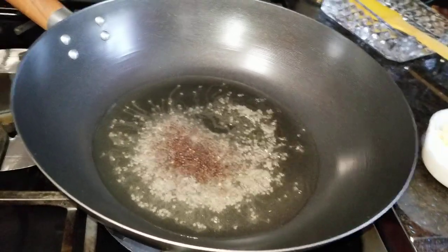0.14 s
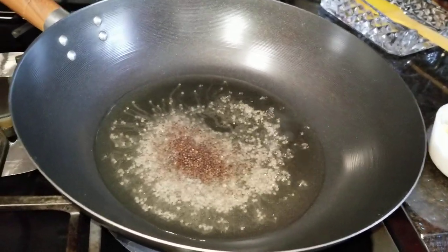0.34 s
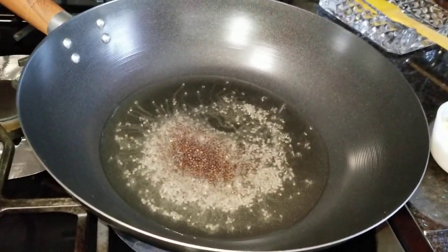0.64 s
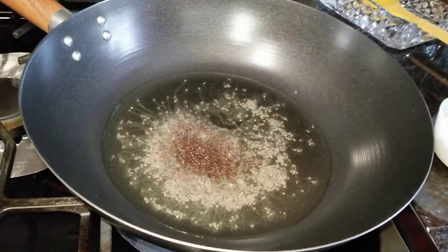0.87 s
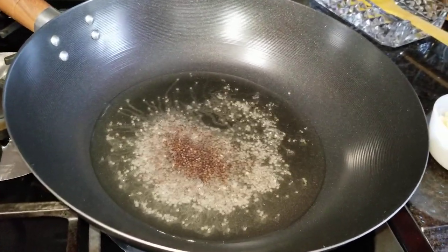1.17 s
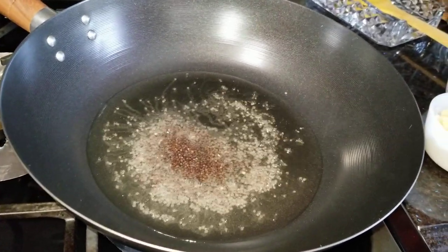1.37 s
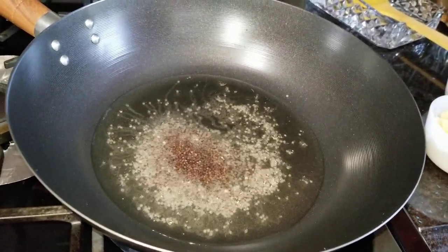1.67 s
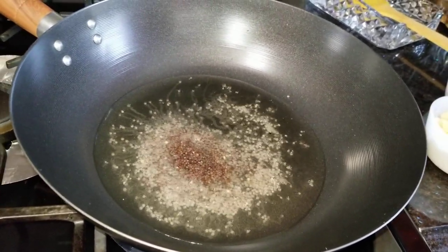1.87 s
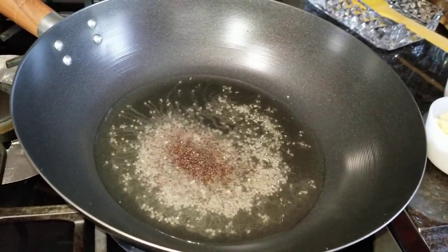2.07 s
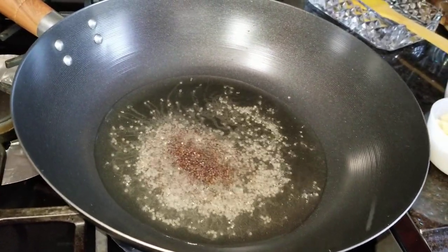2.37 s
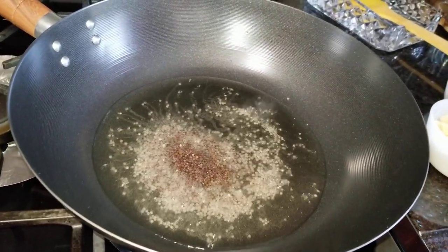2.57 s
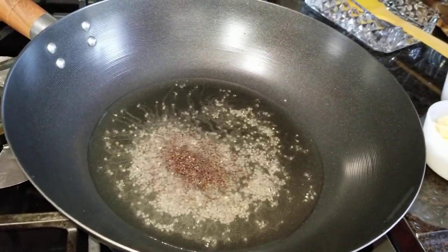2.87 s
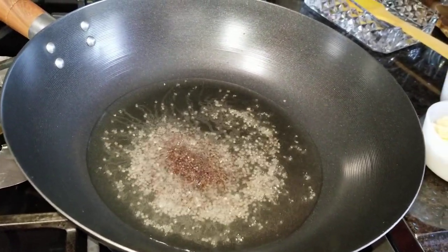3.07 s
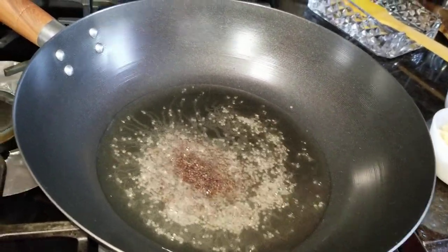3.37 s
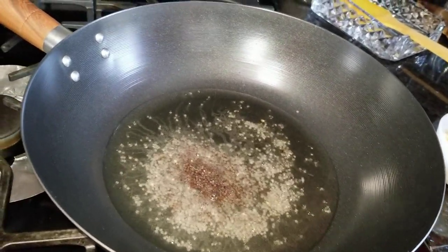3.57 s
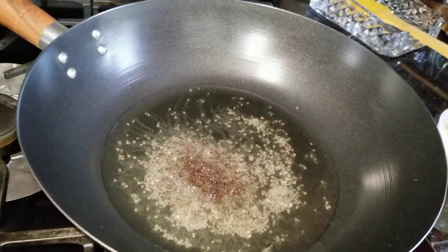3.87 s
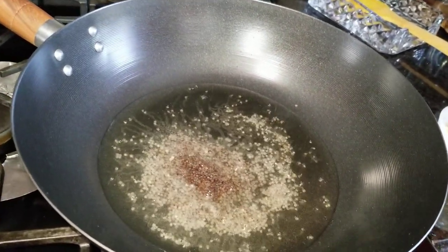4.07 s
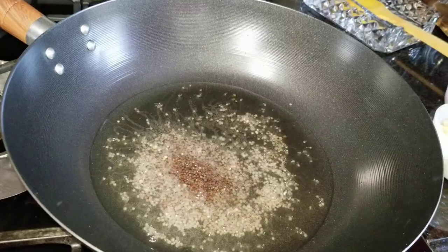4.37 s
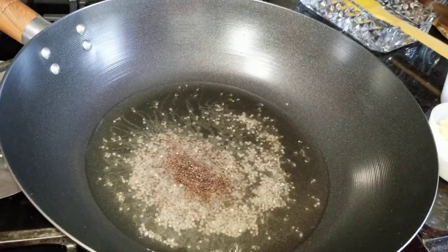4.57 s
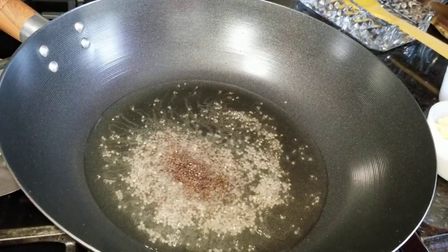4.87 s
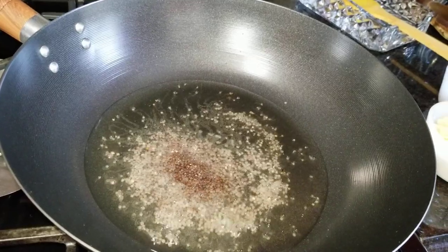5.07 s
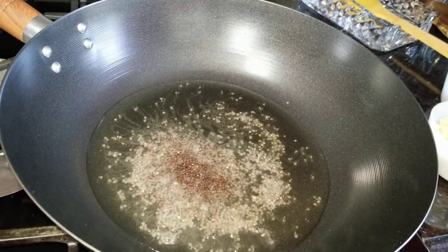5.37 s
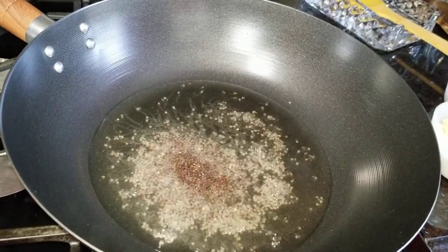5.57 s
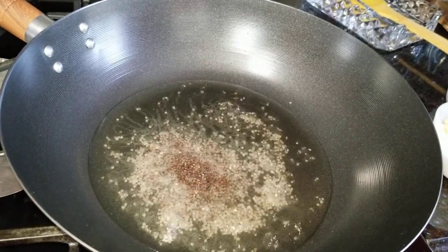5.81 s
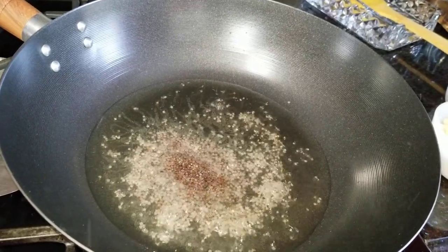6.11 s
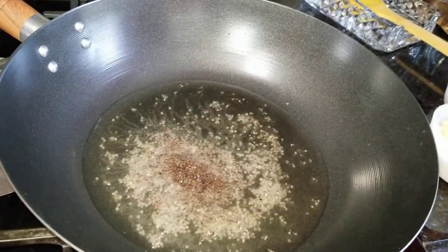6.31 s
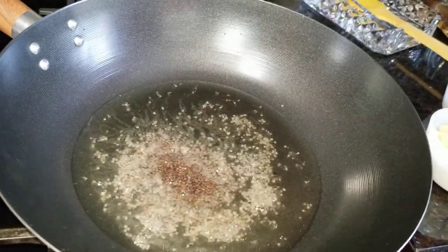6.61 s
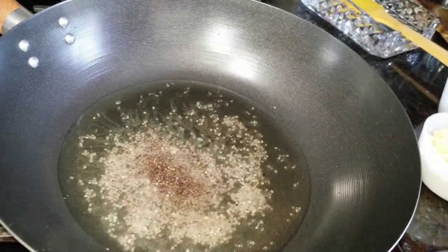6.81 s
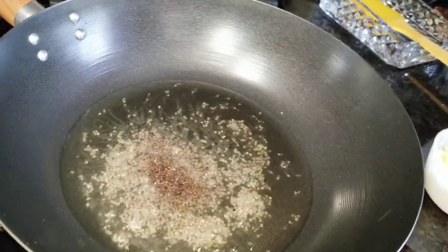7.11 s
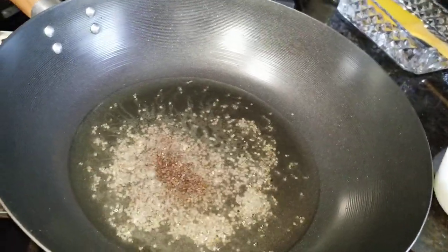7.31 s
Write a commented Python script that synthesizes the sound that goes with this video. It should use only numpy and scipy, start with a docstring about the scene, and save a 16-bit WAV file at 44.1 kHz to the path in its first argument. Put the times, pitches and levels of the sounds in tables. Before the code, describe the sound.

Mustard seeds burst in hot oil in a wok, very close to a stereo microphone in a small hard-walled kitchen. Sharp irregular pops, snaps and ticks ride on fine bright fizz, with tiny chirping bubbles and brief steam spits. They start busy, thin out after the first second, then crowd together from about three seconds. Two deep thumps jolt the microphone, near 0.7 and 5.7 seconds.

```python
"""Mustard seeds bursting in hot oil

Seeds burst in a wok, close to a stereo camera in a small hard-walled kitchen. Each burst is an impulse
coloured by a plop, a snap and a tick; some bubbles ring with a rising note, some husks sputter steam.
Sparse decaying echoes make the room. Blasts displace a microphone, and its low cut rings.
Under it lie the fizz of the oil, a crackling filtered noise, and a kitchen hum of rumble and motor tones;
the level of both drops abruptly at times and drifts gradually in between."""
import sys
import numpy as np
from scipy import signal
from scipy.fft import rfft, irfft
from scipy.io import wavfile
from scipy.ndimage import uniform_filter1d, minimum_filter1d

SR = 44100
rng = np.random.default_rng(int(sys.argv[2]) if len(sys.argv) > 2 else 0)


def store_wav(level_fs):
    """Save 16-bit WAV to argv[1]."""
    pcm = np.round(np.clip(np.atleast_2d(level_fs), -1, 1) * 32767)
    wavfile.write(sys.argv[1], SR, pcm.T.astype(np.int16))


def makeup_ratio(level_db):
    """Linear amplitude ratio for a level in decibels (20 dB per factor of ten)."""
    decades = np.asarray(level_db, float) / 20
    return 10 ** decades


N = 328545
BURST, LEAD = 300, 40  # samples in a burst, and of run-up before its peak

# Background level, with abrupt drops and gradual drifts. Each row: time in seconds, reference level in dB.
BACKGROUND = [(0, -52.5), (.7, -51.5), (0.759, -63.5), (1.6, -63), (2.098, -60.5), (2.9, -59), (3.4, -52.5),
              (4.2, -55), (4.6, -54.5), (5.6, -53.5), (5.721, -57.5), (6.8, -60), (7.45, -58.5)]


def evened(x):
    """Normalization: scales a signal to an rms of 1."""
    return x / np.sqrt(np.mean(x ** 2) + 1e-20)


def read(points, hz, column=1):
    """Spectral envelope: interpolates a table along log frequency."""
    table = np.transpose(points)
    return np.interp(np.log(hz + 1), np.log(table[0] + 1), table[column])


def noise(spectrum, same, patchy_db):
    """Partly coherent noise: two channels of random short-time spectra share a part; patches drift."""
    hz = np.fft.rfftfreq(1024, 1 / SR)
    a, b, c, d, patches = rng.standard_normal((N // 256 + 5, 513, 5)).T
    patches = uniform_filter1d(patches, size=10, axis=0)  # along frequency
    patches = evened(uniform_filter1d(patches, size=8, axis=1))  # along time
    same = np.clip(same, 0, 1)
    left = a + 1j * b
    right = same * left + np.sqrt(1 - same ** 2) * (c + 1j * d)
    z = np.array([left, right])
    z *= makeup_ratio(read(spectrum, hz)[:, None] + patchy_db * patches)
    return evened(signal.istft(z, nperseg=1024, noverlap=768)[1][:, :N])


def background_db(seconds):
    """Level envelope: interpolates the reference level of the background at the given times."""
    return np.interp(seconds, *np.transpose(BACKGROUND))


def fizz():
    """Superposition: countless tiny bubbles in the oil merge to a bright, finely crackling hiss."""
    # Spectrum of the hiss. Each row: frequency in Hz, relative level in dB per Hz.
    fizz_spectrum = [(400, -40), (900, -24), (2000, -24), (4000, -13), (8000, -7), (9500, -8), (11500, -1),
                     (15600, -1), (16200, -25)]
    crackle = uniform_filter1d(rng.exponential(1, (2, N)) ** 2 - 2, size=40)
    crackle = makeup_ratio(3.2 * evened(crackle))
    level_db = background_db(np.arange(N) / SR) + [[8.5], [6.5]]  # left, right
    return crackle * noise(fizz_spectrum, same=0.049, patchy_db=2.9) * makeup_ratio(level_db)


def hum():
    """Tones in noise: a few slightly wavering motor tones, equal in both channels, over a low rumble."""
    # Rumble under the tones. Each row: frequency in Hz, relative level in dB per Hz.
    rumble_spectrum = [(30, -8.5), (55, 5.5), (90, -25), (130, -8.5), (430, -15.5), (560, -19.5),
                       (1000, -28.5), (1500, -47)]
    # Motor tones. Each row: frequency in Hz, relative level in dB.
    motor_tones = [(59.2, -63), (123.8, -72.5), (236.9, -73.5), (355.3, -71.5), (414.5, -76)]
    t = np.arange(N) / SR
    waver = evened(uniform_filter1d(rng.standard_normal((len(motor_tones), N)), size=9000))
    tones = np.zeros(N)
    for (hz, db), waver_db in zip(motor_tones, 1.2 * waver):
        tones += makeup_ratio(db + waver_db) * np.sin(2 * np.pi * (hz * t + rng.random()))
    rumble = noise(rumble_spectrum, same=0.77, patchy_db=0.5)
    return (0.84 * rumble + 0.79 * evened(tones)) * makeup_ratio(background_db(t))


def pop(s, chance, plop_db, snap_db, tick_db):
    """Impulse and scattering: one sharp crack, scattered by the curved wok wall, takes a colour."""
    # The treble leans left as the camera drifts. Each row: time in seconds, left over right in dB.
    treble_lean = [(0, 5.5), (2.8, 3.5), (3.7, 10), (7.45, 8)]
    t = np.arange(BURST) / SR
    crack = .18 * (chance[0] + chance[1:]) * np.exp(-t / .0004)
    crack[:, 0] = -1  # the husk splits
    crack[1] = np.roll(crack[1], round(abs(chance[0, -1])))  # reaches the right microphone a little later
    plop_hz = 3100 * (1 + .09 * chance[1, -1])  # steam bubbles differ in size
    colour = [(300, plop_db - 22.5), (1000, plop_db - 15.0), (2000, plop_db - 10.5), (plop_hz, plop_db),
              (6500, snap_db), (9300, (snap_db + tick_db) / 2 - 3), (12000, tick_db), (16000, tick_db - 5)]
    hz = np.fft.rfftfreq(BURST, 1 / SR)
    lean_db = np.interp(s, *np.transpose(treble_lean)) * np.array([[.5], [-.5]]) * np.minimum(hz / 9000, 1)
    # each husk has its own peaks and dips
    uneven_db = 2 * evened(uniform_filter1d(chance[2, -len(hz):], size=9))
    spectrum = rfft(crack) / np.linalg.norm(crack, axis=1)[:, None]
    spectrum *= makeup_ratio(read(colour, hz) + lean_db + uneven_db)
    return np.roll(irfft(spectrum, BURST), LEAD, 1)


def bursts(events):
    """Linear superposition: adds up pops, each given by its peak's moment and its plop, snap, tick in dB."""
    out = np.zeros((2, N + SR))
    for s, *levels in events:
        chance = rng.standard_normal((3, BURST))
        out[:, round(s * SR) - LEAD:][:, :BURST] += pop(s, chance, *levels)
    return out[:, :N]


def large_seeds():
    """Impulsive sources: large seeds burst, and drops of oil flung by each land as weaker ticks."""
    # Seeds bursting. Each row: moment of the crack's peak in seconds, then plop, snap and tick levels in dB.
    large_bursts = [(0.0605, 2, -8, -2), (0.135, 1, -38, -17), (0.192, -3.5, -1, -10),
                    (0.1948, 1, 1.5, -0.5), (0.2578, 5, 0, -3), (0.3794, -13, -14, -17),
                    (0.4456, -9, -7, -26), (0.4701, -5.5, -4.5, -6), (0.5326, 4.5, 1.5, 14.5),
                    (0.5522, -2.5, -11, 1), (0.629, -4, -4, -2), (0.6822, -3, 0, 4), (0.891, -2, -14.5, -5),
                    (0.9209, 0, -10.5, -8), (1.1495, -6, -13, -2), (1.2245, -13, -8, -3),
                    (1.2574, 2.5, 0, -8), (1.4265, -10.5, -9, -12), (1.6265, -7, -4.5, 4.5),
                    (1.845, -11.5, -10.5, -14), (1.9701, -3, -3.5, 3), (1.9926, -20, -11, -11),
                    (2.2237, 5, 3, -2.5), (2.2588, -3.5, -6, 1), (2.2957, -22, 1.5, -19),
                    (2.537, 1.5, 1.5, 0.5), (2.7048, 2, -6, 1), (2.825, -6, -7, -1.5),
                    (2.8806, -3.5, -10, 0), (2.9011, 2, -11, -4), (2.9099, 4.5, -2, 2), (3.1443, 8, 3.5, 3),
                    (3.3147, 2.5, -6, -1.5), (3.4697, -19, -4, -12), (3.5171, -1.5, 2, 3),
                    (3.649, 8.5, 5.5, 2), (3.6601, -5, -3, -8), (3.723, -19, -12, -2), (3.782, -17, -23, 2),
                    (3.8016, 6, 7, 14), (3.879, 0.5, -20, 1.5), (3.9226, 1, -6, 1), (3.9427, 11, 5, 1.5),
                    (4.0032, -0.5, -11, 1.5), (4.049, -3, -6, -1), (4.1027, 3, -10, -22),
                    (4.1943, -3.5, -5.5, -1), (4.2352, -6.5, -6, 2.5), (4.2846, -39, -10, -7),
                    (4.5313, -8, -7.5, -12), (4.612, -2, -9, -9), (4.6297, 3, 0.5, -4),
                    (4.6492, 8, 0, -2.5), (4.6987, 6, -4, -31), (4.765, -0.5, 3.5, -6), (4.84, -4, -9, -18),
                    (4.9406, -10.5, -8, 0.5), (4.974, -27, -5, -6), (5.0506, 0, -14, 2),
                    (5.086, 4, -34, -3), (5.11, -1, 8, 3.5), (5.2301, -6.5, -27, 2), (5.258, 0.5, -7, 6),
                    (5.2768, -10, -21, -8), (5.3715, -17.5, -5, -6), (5.4698, -6.5, -11, -0.5),
                    (5.482, -2, -4, -6), (5.501, 5.5, -4, -7), (5.5236, -2, -6, -2), (5.5487, -40, -6, 1),
                    (5.6152, 3.5, -10.5, -2.5), (5.6871, -4.5, -2, -4), (5.798, 1, 4, -6),
                    (5.8168, 7.5, -19, -29), (5.8347, -18, 2.5, 13.5), (5.9329, -1.5, -5, 7),
                    (5.959, -3, -7, -14), (5.9768, 1.5, -4, 0), (6.0686, 6.5, -1.5, -3),
                    (6.079, -29, -1.5, 0), (6.1564, 5, -4, -5), (6.1847, -4, -9.5, -5),
                    (6.202, -10, -6, -18), (6.239, -8, -3, -9), (6.353, -1.5, -7, -7),
                    (6.5036, -19.5, -23, -5.5), (6.5931, 3.5, -10, 6), (6.6349, 0, -4, -3.5),
                    (6.78, 1, -3.5, -14), (6.7971, -18, -3.5, -10), (6.8767, -26, -12, -9),
                    (6.9238, -5.5, -19, -4), (7.083, -34, -1, -16), (7.0947, 1.5, -17, -10),
                    (7.1615, -10, -10, -0.5), (7.372, -5.5, -6, 3)]
    events = list(large_bursts)
    for s, *levels in large_bursts:
        for delay, *weaker in rng.random((2, 4)):  # two drops
            landing = s + .35 * delay ** 2  # most land soon, a few late
            events.append((landing, *(levels - (20 + 12 * np.array(weaker)))))
    return bursts(events)


def small_seeds():
    """Random point process: lesser seeds burst at random moments, at levels tied to the background."""
    per_s, over_db, spread_db = 55, 27, 5  # rate; level over the background; scatter of plop, snap, tick
    count = round(per_s * N / SR)
    moments = LEAD / SR + rng.random(count) * N / SR
    levels = background_db(moments)[:, None] + over_db + spread_db * rng.standard_normal((count, 3))
    return bursts(np.column_stack([moments, levels]))


def kitchen(x):
    """Reverberation: sparse echoes set in after a millisecond; three tails take turns, so echoes vary."""
    # Reverberation by band. Each row: frequency in Hz, relative echo level in dB, t60 in seconds.
    reverberation = [(1050, 9, 0.31), (3260, 9, 0.14), (6460, 8.5, 0.22), (12700, 8, 0.2)]
    out, count = np.zeros((2, N)), SR // 2
    turn = np.arange(N) / SR * 23  # radians
    for k in range(3):
        taps = np.zeros((2, count))
        at = np.arange(50, count - 8, 8) + rng.integers(0, 8, (2, (count - 51) // 8))
        np.put_along_axis(taps, at, rng.standard_normal(at.shape), 1)
        hz, t, z = signal.stft(taps, SR, nperseg=128)
        t60 = read(reverberation, hz, column=2)[:, None]
        decay = makeup_ratio(-60 * t / t60)
        decay += makeup_ratio(-24 - 60 * t / (3 * t60))  # the slower tail of the next room
        decay *= makeup_ratio(read(reverberation, hz)[:, None]) / np.linalg.norm(decay, axis=1)[:, None]
        tail = signal.istft(z * decay, SR, nperseg=128)[1] * np.sqrt(8 / 64)
        share = np.sqrt(2 / 3) * np.cos(turn + k * np.pi / 3)
        out += signal.oaconvolve((x.mean(0) * share)[None], tail, axes=1)[:, :N]
    return out


def sputters():
    """Jet noise: steam leaves some husks in short uneven hisses that rise quickly and die away."""
    # Hisses. Each row: start in seconds, level in dB before the rise and decay shape it.
    steam_hisses = [(0.064, -30.5), (0.63, -24), (0.682, -27.5), (3.651, -31), (3.802, -35), (3.923, -29),
                    (4.005, -25), (4.055, -25.5), (4.234, -31), (4.818, -34.5), (4.98, -31.5), (5.058, -24),
                    (5.258, -27)]
    # Spectrum of the steam. Each row: frequency in Hz, relative level in dB per Hz.
    steam_spectrum = [(900, -26), (2500, -17.5), (6500, -13), (9300, -14), (12500, -12.5), (16000, -14)]
    rise_s, t60_s = 0.0025, 0.17
    level, t = np.zeros(N + SR), np.arange(SR // 4) / SR
    for s, db in steam_hisses:
        level[round(s * SR):][:len(t)] += (1 - np.exp(-t / rise_s)) * makeup_ratio(db - 60 * t / t60_s)
    uneven = makeup_ratio(1.2 * evened(uniform_filter1d(rng.standard_normal(N), size=80)))
    return noise(steam_spectrum, same=0.19, patchy_db=-1.5) * level[:N] * uneven


def bubbles():
    """Damped resonance: a crack sets off a bubble's brief rising note, which excites a mode of the wok."""
    # Ringing bubbles. Each row: start of the note, which is the peak of its crack, in seconds,
    # initial pitch in Hz, note level in dB before flutter.
    ringing_bubbles = [(.4104, 3880, -39.5), (0.8193, 3010, -29.5), (0.8563, 3540, -26), (1.342, 2510, -27),
                       (1.4331, 4180, -36), (1.789, 3110, -31.5), (2.009, 3430, -32.5), (2.378, 2760, -39),
                       (2.433, 3160, -32), (2.5527, 2680, -28.5), (2.827, 2460, -30.5), (2.9784, 3670, -32),
                       (3.0269, 3300, -32), (3.307, 4040, -37), (3.486, 3440, -26), (3.601, 2930, -23),
                       (4.0976, 3060, -25), (4.316, 2645, -28.5), (4.478, 3530, -38), (4.8204, 2920, -31),
                       (5.3278, 2680, -28), (5.597, 2720, -34), (6.1489, 2510, -26), (6.569, 2630, -26),
                       (7.0545, 3100, -32), (7.316, 2210, -31.5), (7.3587, 2650, -34),
                       (7.3686, 3000, -25.5)]
    # The mode that the notes set ringing. Each row: frequency in Hz, level in dB, t60 in seconds.
    wok_modes = [(2643, -54.5, 0.26)]
    t60_s, rise_per_s = 0.016, 6.3  # decay; share of its pitch that the note gains in a second
    t, notes = np.arange(4000) / SR, np.zeros(N + SR)
    for s, hz, db in ringing_bubbles:
        flutter = 1 + 1.02 * evened(uniform_filter1d(rng.standard_normal(len(t)), size=60))
        note = np.sin(2 * np.pi * hz * t * (1 + rise_per_s * t / 2)) * flutter
        notes[round(s * SR):][:len(t)] += makeup_ratio(db - 60 * t / t60_s) * note
    t = np.arange(SR // 2) / SR
    wok = sum(makeup_ratio(db - 60 * t / t60) * np.sin(2 * np.pi * hz * t) for hz, db, t60 in wok_modes)
    # plop, snap and tick of the crack, in dB over the note's table level
    cracks = bursts([(s, db + 20, db + 18.5, db + 16.5) for s, hz, db in ringing_bubbles])
    return cracks + notes[:N] + signal.oaconvolve(notes, wok)[:N]


def jolts():
    """Step response: a blast makes the diaphragm jump aside, creep for some milliseconds and stay."""
    # Blasts. Each row: start in seconds, microphone (0 left, 1 right), then sudden jump and slower push,
    # both as displacements before the low cut (full scale = 1).
    blasts = [(.7092, 0, 2.4, 2.0), (.7092, 1, .5, 1.0), (5.6675, 0, 2.0, 3.2), (.9216, 0, -.072, -.054),
              (1.2241, 0, .065, .25), (1.9703, 0, .031, .066), (2.8798, 0, -.05, -.2),
              (3.8018, 0, -.03, -.62), (4.0042, 0, .06, .45), (4.1945, 0, -.056, -.035),
              (4.9737, 0, .06, 1.3), (5.8348, 0, -.03, -.12), (6.0793, 0, -.115, -.58),
              (7.3722, 0, .06, .2)]
    jump, push = np.zeros((2, 2, N))
    for s, side, sudden, slow in blasts:
        jump[round(side), round(s * SR)] += sudden
        push[round(side), round(s * SR)] += slow
    quick, creep = np.exp(-1 / (np.array([.00008, .006]) * SR))  # time constants in seconds
    moves = signal.lfilter([1 - quick], [1, -quick], jump)
    moves += signal.lfilter([1 - creep], [1, -creep], push)
    return np.cumsum(moves, 1)


def scene():
    """Superposition: seeds and bubbles, their echoes, steam, the oil, the hum and the jolts."""
    thrown_db = -9  # share of every burst that goes into the room
    near = large_seeds() + small_seeds() + bubbles()
    return fizz() + hum() + near + kitchen(near * makeup_ratio(thrown_db)) + sputters() + jolts()


def top_cut(x):
    """Nothing passes above the cut-off."""
    return signal.sosfilt(signal.butter(12, 16970, fs=SR, output="sos"), x)


def record(dry):
    """Filtering and gain control: a steep low cut makes jolts ring; a limiter looks 6 ms ahead; band limit."""
    cut = signal.sosfilt(signal.butter(5, 52, "high", fs=SR, output="sos"), dry)
    limit_db, ahead = -4.5, 270  # threshold; look-ahead in samples
    level = uniform_filter1d(abs(cut).max(0), size=7)
    over_db = np.maximum(20 * np.log10(level + 1e-9) - limit_db, 0)
    over_db = -minimum_filter1d(-over_db, size=ahead + 1, origin=-ahead // 2)
    fall = np.arange(N) * 890.0 / SR  # recovers so many dB a second
    over_db = np.maximum.accumulate(over_db + fall) - fall
    limited = cut / makeup_ratio(uniform_filter1d(over_db, size=60))
    edge = signal.firwin(201, 16300, window=("kaiser", 8), fs=SR)
    mix = signal.oaconvolve(limited, edge[None], "same", axes=1)
    return top_cut(mix)


dry = scene()
out = record(dry)
store_wav(out)
```